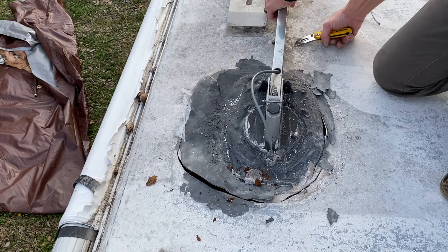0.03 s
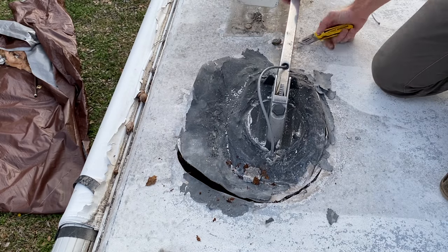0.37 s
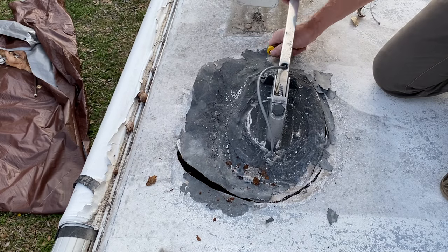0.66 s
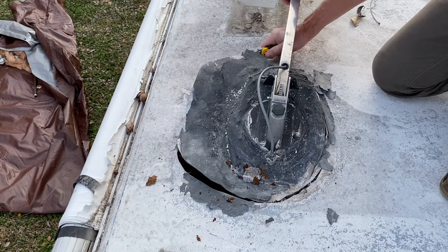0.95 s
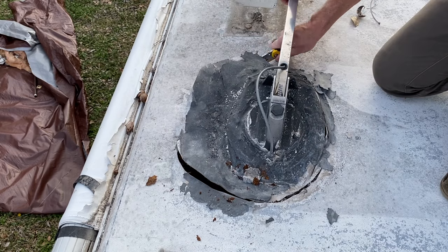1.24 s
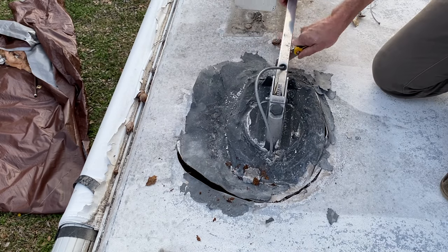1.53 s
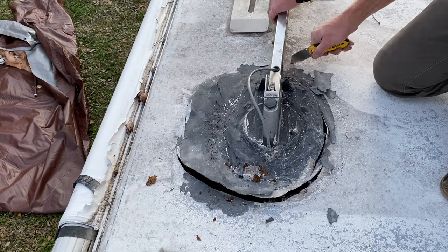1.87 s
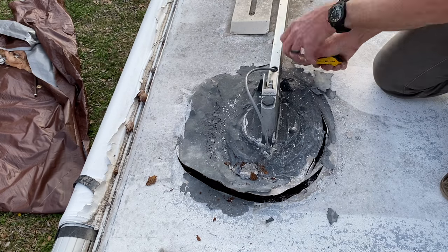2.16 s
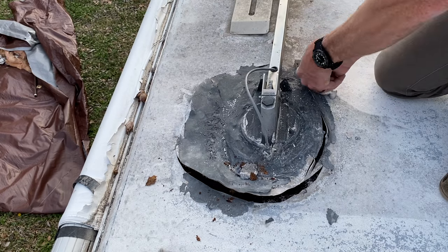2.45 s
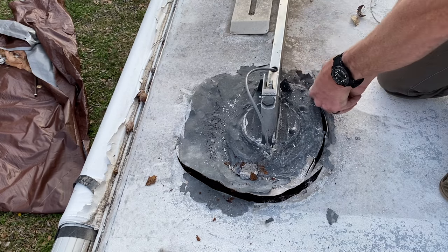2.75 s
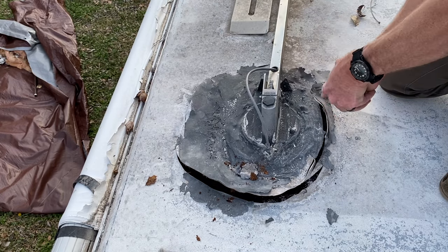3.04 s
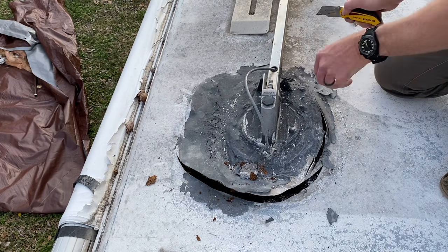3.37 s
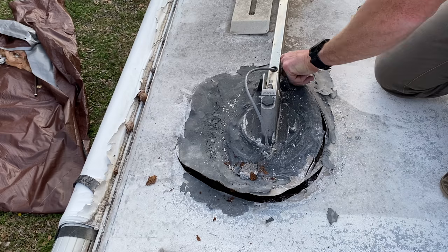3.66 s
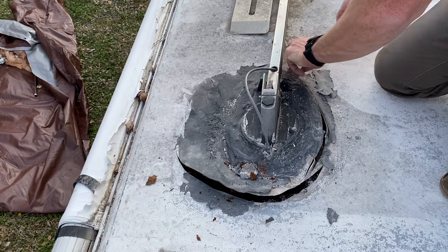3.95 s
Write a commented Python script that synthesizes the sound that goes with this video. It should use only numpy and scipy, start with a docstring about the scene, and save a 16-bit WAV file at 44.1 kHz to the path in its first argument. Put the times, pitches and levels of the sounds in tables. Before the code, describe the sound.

A knife scrapes old sealant on a hollow camper roof in short strokes, with ticks and a metallic ping. A loud scrape and thump follow, then a snap, peeling and dull knocks, as wind rumbles and a distant engine speeds up.

```python
"""Scraping sealant off a camper roof

A knife scrapes and cuts old sealant on a hollow roof; a hand then tugs the lifted patch. Stick-slip
friction and dull knocks drive the roof panel, while the steel blade ticks over grit and rings. Light
wind rumbles, and a distant engine drones and speeds up. A two-port camera microphone listens."""
import sys
import numpy as np
from scipy import signal
from scipy.fft import rfft, irfft
from scipy.io import wavfile
from scipy.ndimage import uniform_filter1d

SR = 44100
rng = np.random.default_rng(int(sys.argv[2]) if len(sys.argv) > 2 else 0)


def put_to_file(sound):
    """Save the sound as 16-bit audio at rate SR, in the file named by the first command-line argument."""
    columns = np.atleast_2d(sound).T  # one column per channel
    safe = np.clip(columns, -1, 1)
    whole_steps = np.round(safe * 32767)
    wavfile.write(sys.argv[1], SR, whole_steps.astype(np.int16))


N = 176400

# Wind and open air (frequency [Hz], relative spectral density [dB])
WIND_SPECTRUM = [(28, -40), (45, 1), (130, -3), (220, -13), (900, -17), (2000, -30), (4200, -48.5),
                 (15500, -56)]
# Likeness of the wind at the two ports (frequency [Hz], coherence [0-1])
WIND_COHERENCE = [(40, 1), (500, 0.12)]
WIND_DB, GUST_DB, DRIFT_DB = -38.5, 1.5, 2.5

# Engine firing (time [s], rate [Hz])
FIRING_RATE = [(0, 47), (3.05, 43.5), (3.25, 44.5), (3.5, 56), (3.7, 62.5), (4, 71)]
# Engine loudness (time [s], gain [dB])
ENGINE_GAIN = [(0, -43.5), (2.5, -45), (2.72, -38.5), (2.92, -41.5), (3.05, -35), (3.44, -30.5),
               (3.53, -27), (4, -29)]
# Exhaust resonances (frequency [Hz], gain [dB])
EXHAUST_RESPONSE = [(46, -10), (55, 1), (64, 4.5), (85, -5.5), (118, -13), (131, 1.5), (143, -2),
                    (166, -11.5), (195, -30.5), (400, -19)]

# Peeling sealant, then soft breathy swishes falling in pitch
# (mid time [s], half length [s], level [dB], resonance [Hz])
PEEL_AND_SWISHES = [(2.713, 0.054, -38, 1860), (2.904, 0.12, -48.5, 1460), (3.228, 0.1, -51, 1170),
                    (3.392, 0.036, -44.5, 990)]
# The loose patch slapping the roof (time [s], level [dB], frequency [Hz], T60 [s])
PATCH_SLAPS = [(1.049, -25, 184, 0.035), (1.994, -12.5, 119, 0.15)]
# A hard piece snapping: its time and its plastic modes (frequency [Hz], level [dB], T60 [s])
SNAP_AT_S, SNAP_MODES = 2.467, [(1960, -20, 0.014), (3830, -25, 0.022)]
# Strikes on the blade (time [s], level [dB])
BLADE_STRIKES = [(0.811, -26.5), (0.917, -45.5), (0.94, -44.5)]
# Steel blade modes (frequency [Hz], relative level [dB], T60 [s])
BLADE_MODES = [(3680, -7, 0.08), (4780, -5.5, 0.085), (7050, -10, 0.09), (9230, -2, 0.085),
               (12110, 5, 0.051), (15250, 8, 0.08)]
# The blade tip snapping over grit (time [s], tick [dB], crack [dB])
TIP_TICKS = [(0.2071, -61, -50), (0.239, -58.5, -59), (0.6877, -32, -37), (1.0285, -47, -54),
             (2.467, -32.5, -27), (2.6379, -45.5, -40), (3.176, -52, -56), (3.382, -51, -68),
             (3.695, -45, -57)]
# Sealant letting go and knuckles bumping the roof (time [s], tick [dB], thud [dB], crack [dB])
ROOF_KNOCKS = [(0.4081, -68, -34, -46), (0.8092, -41, -40, -37), (1.0443, -37, -28.5, -42),
               (1.3929, -54, -29, -36), (1.437, -50, -27, -41), (1.9927, -32.5, -25.5, -28),
               (2.0131, -37, -41, -22), (2.0187, -50, -25.5, -16.5), (2.0538, -36, -30, -24.5),
               (2.7058, -47, -32, -31), (3.761, -48.5, -22.5, -45), (3.7796, -44, -27, -28.5),
               (3.7966, -50, -23.5, -45), (3.8284, -61, -21.5, -47), (3.907, -54, -27, -38.5)]
TICK_DECAY_S, KNOCK_DECAY_S, THUMP_HZ, THUMP_T60_S = 0.00051, 0.0013, 300, 0.033
# Roof panel and mount modes (frequency [Hz], relative level [dB], T60 [s])
ROOF_MODES = [(498.5, 11.5, 0.042), (576, 12.5, 0.068), (639, 9.5, 0.043), (1270, -27, 0.072),
              (1387, -12, 0.15), (2304, -0.5, 0.077), (2923, 2, 0.091), (3650, 4, 0.033)]

# Scraping strokes (start [s], length [s], roof body [dB], rasp [dB], grit [dB])
KNIFE_STROKES = [(-0.013, 0.48, -71, -82, -60), (0.399, 0.0086, -38.5, -52, -44),
                 (0.608, 0.049, -67, -64, -49.5), (0.685, 0.018, -47.5, -47, -46.5),
                 (1.194, 0.074, -43.5, -47, -59), (1.403, 0.071, -36.5, -40.5, -47.5),
                 (1.559, 0.11, -36, -43.5, -43.5), (1.834, 0.24, -48.5, -56.5, -51.5),
                 (1.997, 0.037, -23, -23.5, -38.5), (2.037, 0.048, -22, -27, -36),
                 (2.09, 0.031, -29, -39.5, -36.5), (2.132, 0.11, -41, -48.5, -63),
                 (2.277, 0.027, -49, -50, -46.5), (2.494, 0.029, -35, -40.5, -46),
                 (2.646, 0.08, -31, -37, -39), (3.632, 0.32, -46.5, -52, -53),
                 (3.76, 0.086, -35, -51.5, -49.5)]
SWELL_SHARE, RELEASE_S = 0.14, 0.014  # pressure builds over a share of the stroke's length
SLIPS_PER_S, SLIP_SPREAD_DB, SMOOTH_SHARE = 2400, 3, 0.12
JUDDER_HZ, JUDDER_DB = 67, 3
# Low body of the hollow roof (frequency [Hz], relative level [dB])
BODY_SPECTRUM = [(40, -22), (130, 0), (220, 2), (400, -0.5), (560, -8.5), (780, -6), (1300, -12),
                 (6000, -100.5)]
# Midrange rasp of a contact (frequency [Hz], relative level [dB])
RASP_SPECTRUM = [(300, -11.5), (800, 6), (1400, 10), (2100, 7), (3300, 0.5), (5000, -7), (8000, -6.5),
                 (15000, -43)]
# Treble hiss of grit (frequency [Hz], relative level [dB])
GRIT_SPECTRUM = [(1500, -30), (5000, 19.5), (10300, 19.5), (12000, 12), (15500, 21)]
# Bright tick of the blade tip (frequency [Hz], relative level [dB])
TICK_SPECTRUM = [(800, -73), (4000, 7), (8000, 9), (10200, 20), (14000, 6.5)]

ECHO_DB, ECHO_T60_S, SCATTER_DB, SCATTER_T60_S = -11.5, 0.069, -7.5, 0.03
PORT_SPLIT_HZ, PORT_LAG_S, BALANCE_DB, CUTOFF_HZ = 6660, 0.000287, -0.86, 16000


def amp(db):
    """Amplitude ratio of a level in decibels."""
    return 10 ** (np.asarray(db) / 20)


def unit_rms(x):
    """Normalisation to rms 1."""
    return x / np.sqrt(np.mean(x ** 2) + 1e-20)


def unit_energy(x):
    """Normalisation to energy 1."""
    return x / np.sqrt(np.sum(x ** 2, -1, keepdims=True) + 1e-20)


def impact(x):
    """Normalisation of a transient to the energy of 8 ms at rms 1."""
    return unit_energy(x) * np.sqrt(.008 * SR)


def curve_at(points, hz):
    """Interpolation on a log-frequency axis."""
    f, value = np.transpose(points)
    return np.interp(np.log(hz + 1), np.log(f), value)


def add(mix, start_s, sound):
    """Superposition of a sound on the mix."""
    part = mix[max(round(start_s * SR), 0):][:len(sound)]
    part += sound[:len(part)]


def wander(hz):
    """Random modulation: noise of rms 1, low-passed at hz."""
    f = np.fft.rfftfreq(N, 1 / SR)
    return unit_rms(irfft(rfft(rng.standard_normal(N)) / (1 + (f / hz) ** 4), N))


def colour(x, spectrum, size=4096):
    """Minimum-phase filtering by an impulse response of energy 1."""
    log_gain = np.log(amp(curve_at(spectrum, abs(np.fft.fftfreq(size, 1 / SR)))))
    response = np.exp(np.conj(signal.hilbert(log_gain)))
    taps = np.fft.ifft(response).real[:size // 2]
    return signal.oaconvolve(x, unit_energy(taps))[:N]


def ring(modes, wave=np.sin):
    """Free vibration: a sum of exponentially damped modes."""
    t = np.arange(SR // 2) / SR
    return sum(amp(db) * np.exp(-np.log(1000) * t / t60) * wave(2 * np.pi * hz * t)
               for hz, db, t60 in modes)


def fracture(decay_s):
    """A brief cluster of fractures radiates a broadband noise burst."""
    t = np.arange(SR // 20) / SR
    spectrum = rfft(rng.standard_normal(len(t)) * t * np.exp(-t / decay_s))
    flattened = spectrum / np.sqrt(abs(spectrum) + 1e-12)
    return impact(irfft(flattened)[:len(t) // 2])


def wind(size=2048):
    """Wind is gust-modulated noise whose coherence between the ports falls with frequency."""
    hop = size // 4
    frames, hz = N // hop + 5, np.fft.rfftfreq(size, 1 / SR)
    re1, im1, re2, im2, drift = rng.standard_normal((5, frames, size // 2 + 1)).transpose(0, 2, 1)
    drift = uniform_filter1d(drift, size=8, axis=1)  # smooth in time, then in frequency
    drift = unit_rms(uniform_filter1d(drift, size=16, axis=0))
    gusts = np.interp(np.arange(frames) * hop, np.arange(N), wander(hz=10))
    coherence = curve_at(WIND_COHERENCE, hz)[:, None]
    left = re1 + 1j * im1
    right = coherence * left + np.sqrt(1 - coherence ** 2) * (re2 + 1j * im2)
    gust_db = GUST_DB * gusts / (1 + hz[:, None] / 300)
    gain = amp(curve_at(WIND_SPECTRUM, hz)[:, None] + DRIFT_DB * drift + gust_db)
    _, noise = signal.istft(np.array([left, right]) * gain, nperseg=size, noverlap=size - hop)
    return amp(WIND_DB) * unit_rms(noise[:, :N])


def engine():
    """Source and filter: five harmonics of the firing rate glide through the exhaust resonances."""
    t, drone = np.arange(N) / SR, np.zeros(N)
    firing_hz = np.interp(t, *np.transpose(FIRING_RATE)) * (1 + 0.014 * wander(hz=25))
    cycles = np.cumsum(firing_hz) / SR
    for order in range(1, 6):
        flutter_db = 2.5 * wander(hz=26.6)
        gain = amp(curve_at(EXHAUST_RESPONSE, order * firing_hz) + flutter_db)
        drone += gain * np.sin(2 * np.pi * (order * cycles + rng.random()))
    return np.sqrt(2) * drone * amp(np.interp(t, *np.transpose(ENGINE_GAIN)))


def reflections(x, t60):
    """Diffuse reflection: convolution with a separate decaying noise tail for each port."""
    t = np.arange(SR // 2) / SR
    tail = rng.standard_normal((2, len(t))) * np.exp(-np.log(1000) * t / t60) * (t > .001)
    return signal.oaconvolve(x[None], unit_energy(tail), axes=1)[:, :N]


def peel_and_swishes(relative_width=0.37, hiss_db=-19.5):
    """Resonant noise with a faint hiss: peeling sealant, then soft breathy swishes falling in pitch."""
    t, out = np.arange(N) / SR, np.zeros(N)
    for mid_s, half_s, db, hz in PEEL_AND_SWISHES:
        noise = amp(db) * rng.standard_normal(N) * np.exp(-((t - mid_s) / half_s) ** 2 / 2)
        edges_hz = [hz, hz * (1 + relative_width)] / np.sqrt(1 + relative_width)
        band = signal.butter(2, edges_hz, "bandpass", fs=SR, output="sos")
        makeup = np.sqrt(SR / 2 / (hz * relative_width))
        out += makeup * signal.sosfilt(band, noise) + amp(hiss_db) * colour(noise, GRIT_SPECTRUM)
    return out


def struck_parts(click_share=0.41):
    """Impulsive excitation: a hard piece snaps, the blade pings and the slapping patch booms."""
    out = np.zeros(N)
    add(out, SNAP_AT_S, ring(SNAP_MODES))
    for time, db in BLADE_STRIKES:
        click = colour(fracture(TICK_DECAY_S), TICK_SPECTRUM)
        add(out, time, amp(db) * impact(ring(BLADE_MODES)))
        add(out, time, amp(db) * click_share * click)
    for time, db, hz, t60 in PATCH_SLAPS:
        add(out, time, ring([(hz, db, t60)]))
    return out


def roof_panel(drive, ring_db=-5):
    """Forced vibration: the panel passes on its drive and adds the ringing of its modes."""
    ringing = signal.oaconvolve(drive, ring(ROOF_MODES, np.cos))[:N]
    share = amp(ring_db)
    return (drive + share * drive.std() * unit_rms(ringing)) / np.hypot(1, share)


def stick_slip():
    """Stick-slip friction: dense random impulses under each stroke drive body, rasp and grit."""
    t = np.arange(N) / SR
    slips = (rng.random(N) < SLIPS_PER_S / SR) * rng.choice([-1, 1], N)
    sizes = amp(SLIP_SPREAD_DB * np.minimum(rng.exponential(1, N), 5))
    friction = unit_rms(slips * sizes) + SMOOTH_SHARE * rng.standard_normal(N)
    friction = unit_rms(friction * amp(JUDDER_DB * wander(JUDDER_HZ)))
    power = np.zeros((3, N))
    for start, length, *levels in KNIFE_STROKES:
        swell = (1 + np.tanh((t - start) / (2 * SWELL_SHARE * length))) / 2
        release = np.exp(-np.maximum(t - start - length, 0) / RELEASE_S)
        power += (amp(levels)[:, None] * swell * release) ** 2
    return friction * np.sqrt(power)


def knife_on_roof():
    """Structure-borne sound: strokes and knocks shake the panel; grit and ticks radiate directly."""
    body, rasp, grit = stick_slip()
    thuds, ticks, cracks = np.zeros((3, N))
    for time, tick_db, thud_db, crack_db in ROOF_KNOCKS:
        add(ticks, time, amp(tick_db) * fracture(KNOCK_DECAY_S))
        add(rasp, time, amp(crack_db) * fracture(KNOCK_DECAY_S))
        spot_hz = THUMP_HZ * rng.uniform(0.75, 1.25)  # each spot has its own pitch
        add(thuds, time, amp(thud_db) * impact(ring([(spot_hz, 0, THUMP_T60_S)])))
    for time, tick_db, crack_db in TIP_TICKS:
        add(ticks, time, amp(tick_db) * fracture(TICK_DECAY_S))
        add(cracks, time, amp(crack_db) * fracture(TICK_DECAY_S))
    drive = colour(body, BODY_SPECTRUM) + colour(rasp, RASP_SPECTRUM) + thuds
    tip = colour(cracks, RASP_SPECTRUM) + colour(grit, GRIT_SPECTRUM) + colour(ticks, TICK_SPECTRUM)
    return roof_panel(drive) + tip


def scene():
    """Superposition of the roof work, its reflections, the wind and the engine."""
    work = knife_on_roof() + struck_parts() + peel_and_swishes()
    scatter = amp(SCATTER_DB) * reflections(work, SCATTER_T60_S)
    echo = amp(ECHO_DB) * reflections(work, ECHO_T60_S)
    return work + scatter + echo + wind() + engine()


def record(dry):
    """Two-port pickup: the left treble lags in phase, the balance leans right, the band is limited."""
    hz = np.fft.rfftfreq(N, 1 / SR)
    lag = np.exp(-2j * np.pi * PORT_LAG_S * np.maximum(hz - PORT_SPLIT_HZ, 0))
    left = irfft(rfft(dry[0]) * lag, N) * amp(BALANCE_DB / 2)
    right = dry[1] * amp(-BALANCE_DB / 2)
    lowpass = signal.firwin(201, CUTOFF_HZ, window=("kaiser", 9), fs=SR)
    return signal.oaconvolve(np.array([left, right]), lowpass[None], "same")


dry = scene()
out = record(dry)
put_to_file(out)
```